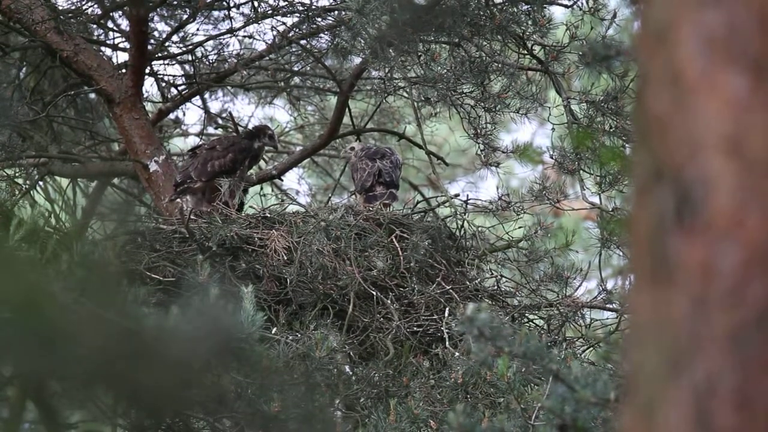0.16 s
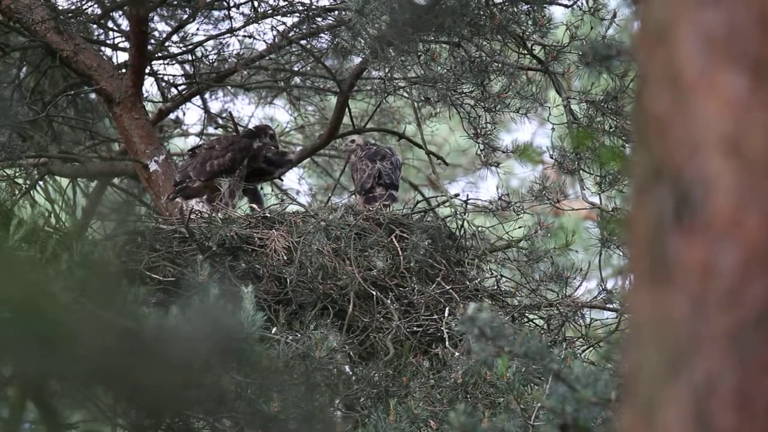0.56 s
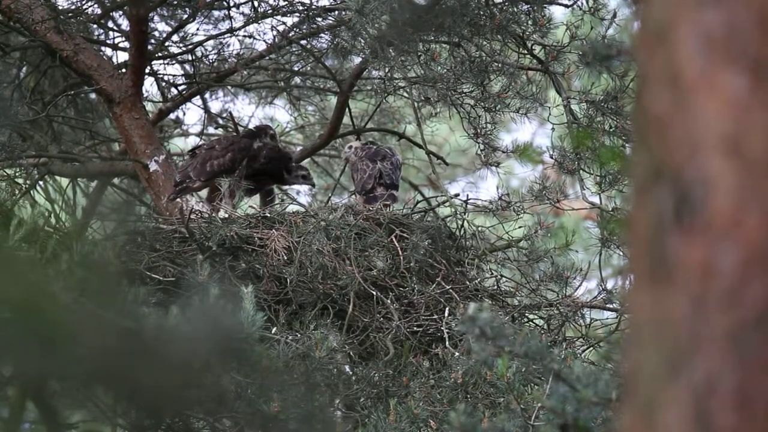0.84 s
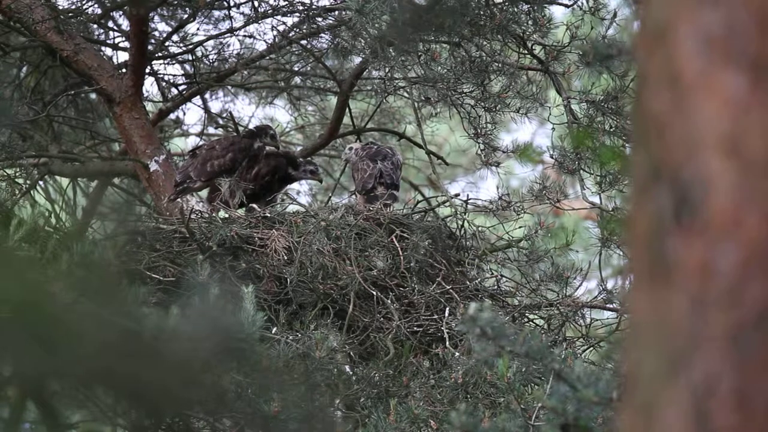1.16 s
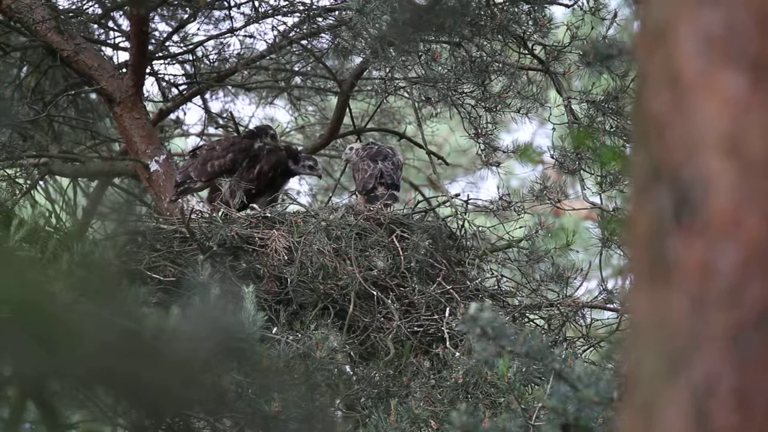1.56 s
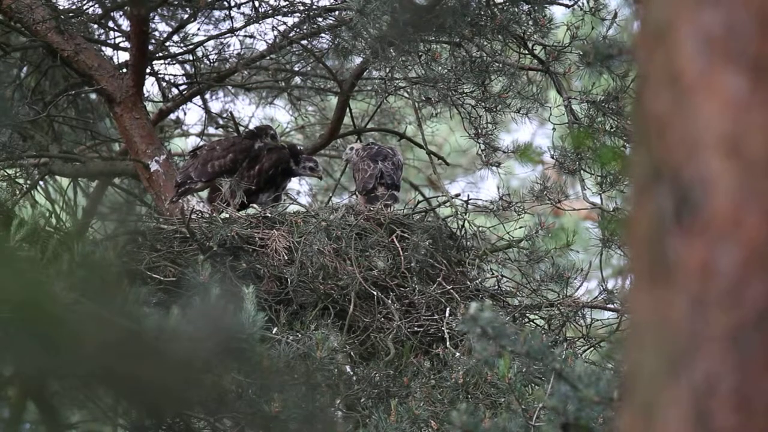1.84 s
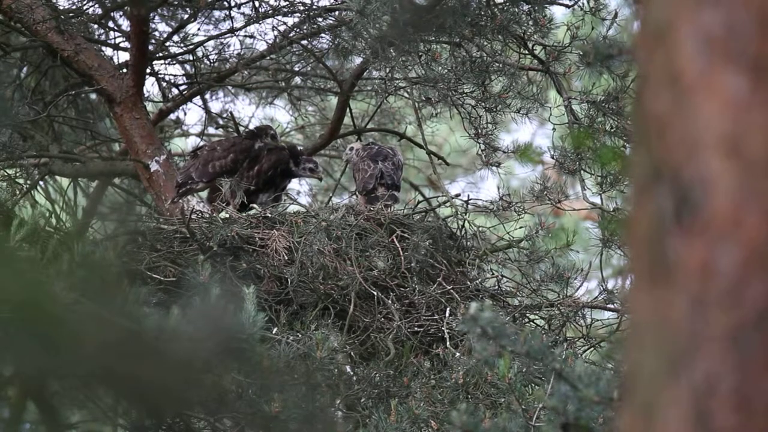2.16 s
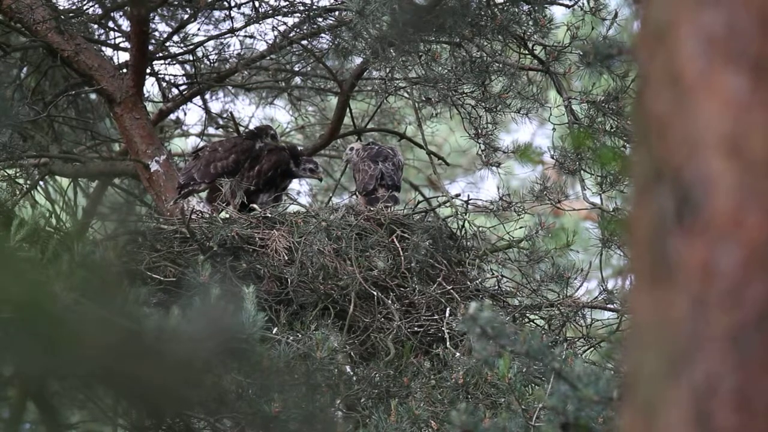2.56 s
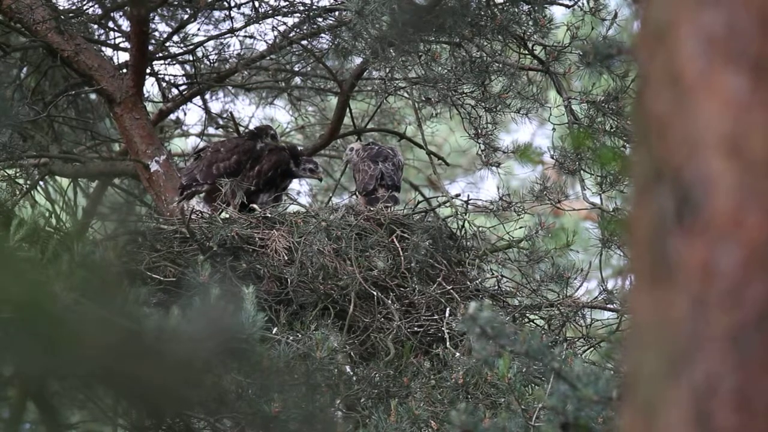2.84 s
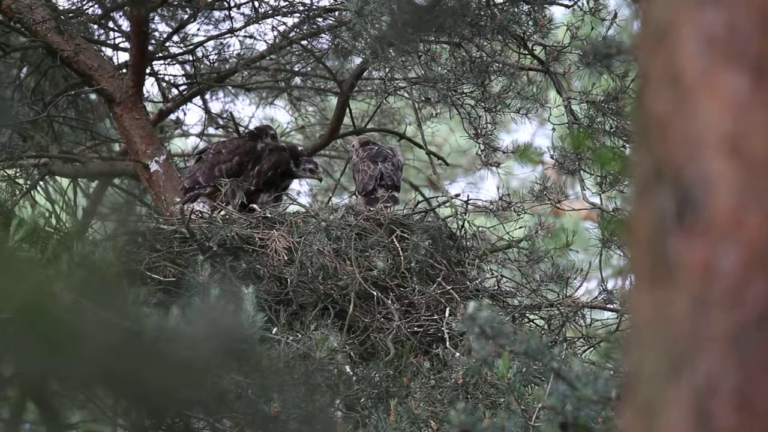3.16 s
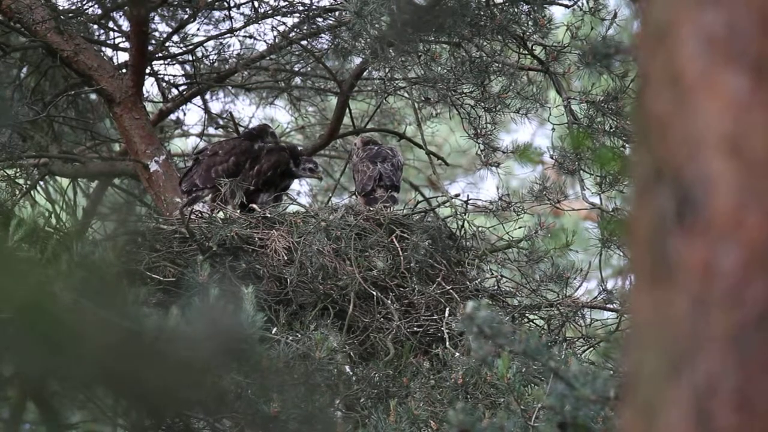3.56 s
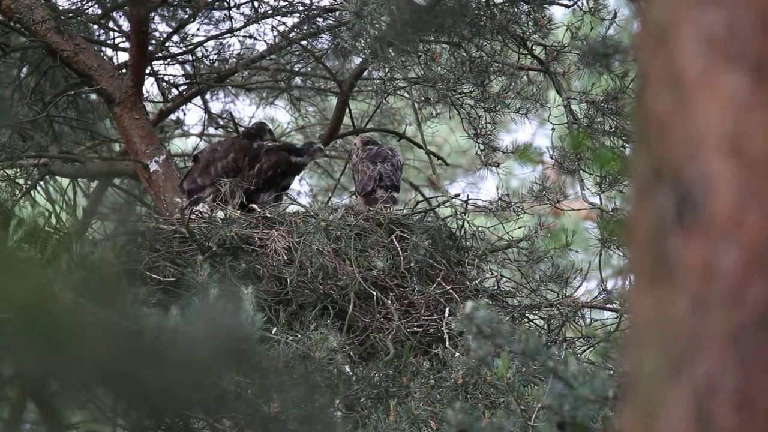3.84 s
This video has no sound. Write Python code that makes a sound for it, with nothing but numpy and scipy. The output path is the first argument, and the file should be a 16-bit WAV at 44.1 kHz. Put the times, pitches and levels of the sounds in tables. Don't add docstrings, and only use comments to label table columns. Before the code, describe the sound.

A small songbird sings thin falling whistles, a rolling trill, a flourish and buzzes in woodland

```python
import sys
import numpy as np
from scipy import signal
from scipy.fft import rfft, irfft
from scipy.io import wavfile
from scipy.ndimage import uniform_filter1d

SR = 44100
rng = np.random.default_rng(int(sys.argv[2]) if len(sys.argv) > 2 else 0)


def makeup_ratio(level_db):
    decades = np.asarray(level_db, float) / 20
    return 10 ** decades


def unload_audio(sound):
    columns = np.transpose(np.atleast_2d(sound))
    steps = np.round(np.clip(columns, -1, 1) * 32767)
    wavfile.write(sys.argv[1], SR, steps.astype(np.int16))


N = 176400
t = np.arange(N) / SR
WAVER, ROUGH_WAVER = .012, .07


def unit_rms(x):
    return x / np.sqrt(np.mean(x ** 2) + 1e-20)


def resonance(x, hz, wide_hz):
    r = np.exp(-np.pi * wide_hz / SR)
    return signal.lfilter([(1 - r * r) / 2, 0, (r * r - 1) / 2], [1, -2 * r * np.cos(2 * np.pi * hz / SR), r * r], x)


def narrow_noise(noise, hz, wide_hz):
    return resonance(resonance(noise, hz, wide_hz), hz, wide_hz)


def lowpass(x, hz, order=1):
    return signal.sosfilt(signal.butter(order, hz, fs=SR, output="sos"), x)


def jitter(smooth_samples, length):
    return unit_rms(uniform_filter1d(rng.standard_normal(N // 8), size=smooth_samples))[:length]


def whistle(out, rows, start=0., db=0., pitch=0.99, top_loss_db=0., waver=WAVER, uneven=0.):
    edge_s, stroke_sharpness = .003, 1.2
    s, *columns = np.transpose(rows)
    note_t = np.arange(s[0], s[-1], 1 / SR)
    hz, level_db, *buzz = [np.interp(note_t, s, c) for c in columns]
    fast, slow = jitter(60, len(note_t)), jitter(300, len(note_t))
    hz = hz * pitch * (1 + waver * fast)
    gain = np.clip(np.minimum(note_t - s[0], s[-1] - note_t) / edge_s, 0, 1)
    if buzz:
        shake_hz, shakes_per_s = buzz
        cycles = np.cumsum(shakes_per_s * np.maximum(1 + uneven * slow, .2)) / SR
        stroke = 1 - 2 * (cycles % 1)
        hz = hz + shake_hz * stroke
        level_db = level_db - top_loss_db * stroke
        gain = gain * (1 - stroke ** 4) ** stroke_sharpness
    wave = np.sin(2 * np.pi * np.cumsum(hz) / SR)
    i = int((start + s[0]) * SR)
    out[i:i + len(note_t)] += np.sqrt(2) * gain * makeup_ratio(level_db + db) * wave


# [f/Hz, level/dB per Hz]
WIND_SPECTRUM = [(15, -55), (25, -23), (113, -10), (152, -12), (241, -5), (588, -2.5), (3680, -19.5),
                 (5090, -20), (15800, -25)]
# [t/s, level/dB]
HUM_LEVEL = [(0, -66.5), (.3, -71), (.4, -62), (.6, -66), (.95, -60.5), (1.25, -71.5), (2.3, -68.5),
             (2.6, -63), (3.2, -65.5), (3.4, -74.5), (3.8, -61)]


def air():
    wind_db, wind_top_hz, hum_hz, hum_wide_hz = -52, 14000, 117.5, 3.1
    hz = np.arange(1, N // 2 + 2) * SR / N
    points_hz, points_db = np.transpose(WIND_SPECTRUM)
    shape = makeup_ratio(np.interp(np.log(hz), np.log(points_hz), points_db))
    shape = shape / np.sqrt(1 + (hz / wind_top_hz) ** 12)
    wind = irfft(rfft(rng.standard_normal(N)) * shape, N)
    wander = unit_rms(uniform_filter1d(rng.standard_normal(N), size=6000))
    pitch = hum_hz + hum_wide_hz * wander
    hum = np.sqrt(2) * np.sin(2 * np.pi * np.cumsum(pitch) / SR)
    return makeup_ratio(wind_db) * unit_rms(wind) + hum * makeup_ratio(np.interp(t, *np.transpose(HUM_LEVEL)))


# [t/s, level/dB]
CRICKET_CHIRPS = [
    (.04, -61.5),
    (.235, -62),
    (.43, -57),
    (.61, -54.5),
    (.795, -50.5),
    (.995, -47),
]


def crickets():
    chirp_s, pulses_per_s, drone_db = .075, 62, -62
    gate = sum(makeup_ratio(db) * np.sin(np.pi * np.clip((t - s) / chirp_s, 0, 1)) for s, db in CRICKET_CHIRPS)
    pulses = np.maximum(np.sin(2 * np.pi * pulses_per_s * t), 0)
    near = unit_rms(narrow_noise(rng.standard_normal(N), 5000, 1000))
    far = unit_rms(narrow_noise(rng.standard_normal(N), 4925, 300))
    return 2 * gate * pulses * near, makeup_ratio(drone_db) * far


# [t/s, peak level/dB, rustle t/s]
TWIG_TICKS = [
    (0.4229, -46, 0.03),
    (1.3923, -36.5, 0.03),
    (1.4417, -41, 0.03),
    (1.9135, -46, .02),
    (2.0117, -44, 0.023),
    (2.164, -36.5, 0.06),
    (2.2405, -36.5, 0.056),
    (2.308, -38, 0.018),
    (2.6967, -41, 0.044),
]
# [t/s, f/Hz, level/dB]
TWIG_KNOCK = [(1.39, 3130, -46.5), (1.396, 2050, -38.5)]


def twigs():
    snap_db, snap_s, rustle_db = -1.5, .003, -12
    snap, rustle = np.zeros(N), np.zeros(N)
    for s, db, tail_s in TWIG_TICKS:
        since = np.maximum(t - s, 0)
        on = t >= s
        rise = np.minimum(since / snap_s * 2, 1)
        snap += on * makeup_ratio(db + snap_db) * np.exp(-since / snap_s) * rise
        rustle += on * makeup_ratio(db + rustle_db) * np.exp(-since / max(tail_s, .005))
    band = signal.butter(3, [2500, 10500], "band", fs=SR, output="sos")
    snaps = signal.sosfilt(band, snap * rng.standard_normal(N))
    rustles = narrow_noise(rustle * rng.standard_normal(N), 11500, 4500)
    knock = np.zeros(N)
    whistle(knock, TWIG_KNOCK, waver=ROUGH_WAVER)
    return knock + snaps + rustles


# [t/s, f/Hz, level/dB]
SWEEP_SHAPE = [(-.006, 7800, -17), (0, 7300, -2), (0.013, 6220, 1.5), (.028, 5000, 2), (.036, 4500, 5),
               (0.046, 3710, 1)]
# [t/s, f/Hz, level/dB]
DIP_SHAPE = [(0, 4950, 1), (.006, 4900, 2), (.014, 4300, 3), (.021, 3800, 2), (.026, 3500, -4),
             (.031, 3900, 2), (.037, 4450, 3), (.045, 4950, 2), (.056, 4930, -2)]
# [t/s, f/Hz, level/dB]
ROLL_SHAPE = [(0, 3450, 5), (.007, 3306, 2.5), (.014, 2842, 3.5), (.02, 2411, -6)]
# [t/s, f/Hz, level/dB]
FLICK_SHAPE = [(0, 5390, 9.8), (.005, 4787, 2.3), (.013, 4200, 14)]
# [t/s, f/Hz, level/dB]
LIFT_SHAPE = [(0, 3260, -1.5), (.012, 3710, -3), (.022, 4300, 5)]
# [t/s, f/Hz, level/dB]
SINK_SHAPE = [(0, 3960, 13), (.012, 3240, -2), (.025, 2800, -3)]
# [t/s, f/Hz, level/dB]
RISE_SHAPE = [(0, 5990, 12), (.012, 9280, 3), (.03, 9140, 2.5), (.045, 8300, -4), (.062, 7580, -10)]
# [t/s, f/Hz, level/dB, shake f/Hz, shakes per s]
THROB_SHAPE = [(0, 5500, -5, 800, 139), (.02, 5905, 0.5, 1010, 139), (.045, 6500, -0.5, 800, 139),
               (.068, 6940, -13, 602.4, 130)]
# [t/s, level/dB, pitch factor]
SWEEP_TIMES = [
    (0.873, -58, 0.97),
    (1.061, -53, 0.94),
    (1.223, -45.5, 0.98),
    (1.387, -43, 0.96),
    (1.548, -44, 1),
    (1.701, -42, 1),
]
# [t/s, level/dB]
DIP_TIMES = [(1.099, -49), (1.177, -48), (1.247, -48.5), (1.328, -48), (1.405, -50), (1.468, -46),
             (1.535, -47), (1.625, -42), (1.672, -47.5), (1.754, -50)]
# [t/s, level/dB, pitch factor]
ROLL_TIMES = [(1.853, -36.5, 0.98), (1.926, -35.5, 0.96), (1.997, -38.5, 0.93), (2.068, -34.5, 0.99),
              (2.137, -35.5, 0.95), (2.208, -34.5, 1.02), (2.278, -33.5, 1.0), (2.346, -35, 1.0),
              (2.416, -35.5, 0.97), (2.483, -37.5, 0.96), (2.555, -34, 0.94)]
# [t/s, level/dB, pitch factor]
FLICK_TIMES = [
    (1.088, -52, 1.18),
    (1.767, -52, 1.13),
    (1.903, -42, 0.892),
    (2.04, -45.5, 0.98),
    (2.187, -46.5, 1.05),
    (2.444, -44, 0.99),
    (2.7, -44.5, 0.77),
]
# [t/s, level/dB, pitch factor]
LIFT_TIMES = [
    (1.824, -37.5, 0.94),
    (1.973, -35, 0.98),
    (2.114, -35, 1.0),
    (2.265, -36, 1),
    (2.321, -39, 1.0),
    (2.396, -38.5, 1.0),
    (2.534, -38.5, 0.94),
]
# [t/s, level/dB, pitch factor]
SINK_TIMES = [(1.125, -59, 0.88), (1.281, -55, 0.88), (1.44, -53, 0.91), (1.584, -49, 0.93),
              (1.664, -46, 0.9), (1.771, -41.5, 0.97), (2.081, -47, 0.75), (2.225, -45.5, 0.75),
              (1.848, -53, 0.85)]
# [t/s, level/dB, pitch factor]
RISE_TIMES = [
    (2.339, -54.5, .72),
    (2.42, -55, 0.68),
    (2.925, -54, 0.983),
    (3.0, -56, 0.99),
    (3.073, -54, 1.0),
    (3.147, -55.5, 0.92),
    (3.219, -53, 0.93),
    (3.28, -54.5, 0.77),
]
# [t/s, level/dB, pitch factor]
THROB_TIMES = [
    (2.925, -45, 1.13),
    (2.995, -43, 1.06),
    (3.064, -41.5, 1.013),
    (3.13, -40.5, 0.98),
    (3.205, -41, 1.0),
    (3.283, -48, 0.7),
]
# [t/s, level/dB, pitch factor]
BLURRED_FLICK_TIMES = [
    (2.67, -46.5, 1.0),
    (3.282, -49, 0.79),
    (3.785, -50, 1.0),
]
# [t/s, f/Hz, level/dB]
DROP_NOTE = [(2.582, 2490, -35), (2.6, 2166, -41), (2.625, 1800, -54)]
# [t/s, f/Hz, level/dB]
FLOURISH_NOTE = [(2.688, 2185, -45), (2.71, 2700, -35.5), (2.741, 3133, -30), (2.757, 3575, -28.5),
                 (2.769, 4310, -30.5), (2.778, 4830, -31), (2.784, 4890, -34.5), (2.795, 5060, -42)]
# [t/s, f/Hz, level/dB]
FALL_NOTE = [(2.786, 3320, -47), (2.799, 3065, -39), (2.82, 2220, -35), (2.84, 1550, -57)]
# [t/s, f/Hz, level/dB]
CHUCK_NOTE = [(3.292, 3424, -34), (3.3, 2574, -41), (3.307, 1900, -45)]
# [t/s, f/Hz, level/dB]
TAG_NOTE = [(3.79, 3946, -41), (3.81, 2990, -47), (3.825, 2042, -46)]
# [t/s, f/Hz, level/dB]
FAINT_NOTES = [
    [(.912, 4680, -57), (.93, 3330, -59), (.942, 4600, -60)],
    [(1.595, 5800, -53), (1.66, 5650, -52.5)],
    [(1.74, 5707, -54), (1.77, 5600, -57)],
    [(2.51, 2520, -46), (2.535, 2030, -55)],
]
# [t/s, f/Hz, level/dB]
HIGH_HAZES = [
    [(2.77, 12800, -46.5), (2.9, 12200, -62)],
    [(3.38, 11650, -55.5), (3.56, 11330, -58)],
]
# [t/s, f/Hz, level/dB]
THUD_NOTE = [(1.44, 2317, -53), (1.455, 1922, -64), (1.469, 1545, -50)]


def birds():
    second_stroke_s, second_stroke_db = 0.027, -4.5
    out = np.zeros(N)
    for shape, times, waver in (
            (SWEEP_SHAPE, SWEEP_TIMES, WAVER), (DIP_SHAPE, DIP_TIMES, WAVER), (ROLL_SHAPE, ROLL_TIMES, WAVER),
            (FLICK_SHAPE, FLICK_TIMES, WAVER), (LIFT_SHAPE, LIFT_TIMES, WAVER), (RISE_SHAPE, RISE_TIMES, .06),
            (SINK_SHAPE, SINK_TIMES, ROUGH_WAVER), (FLICK_SHAPE, BLURRED_FLICK_TIMES, ROUGH_WAVER)):
        for row in times:
            whistle(out, shape, *row, waver=waver)
    for s, db, pitch in SWEEP_TIMES:
        whistle(out, SWEEP_SHAPE[2:], s + second_stroke_s, db + second_stroke_db, pitch)
    for note in (DROP_NOTE, FLOURISH_NOTE, FALL_NOTE, *FAINT_NOTES):
        whistle(out, note)
    for row in THROB_TIMES:
        whistle(out, THROB_SHAPE, *row, top_loss_db=-3.5, waver=ROUGH_WAVER, uneven=.25)
    for note in (CHUCK_NOTE, TAG_NOTE):
        whistle(out, note, waver=ROUGH_WAVER)
    for note in (*HIGH_HAZES, THUD_NOTE):
        whistle(out, note, waver=.1)
    return out


# [t/s, f/Hz, level/dB, shake f/Hz, shakes per s]
LOW_BUZZ_LINE = [(3.366, 5200, -44.5, 497, 230), (3.39, 5160, -34, 776, 199.9),
                 (3.415, 4810, -37.5, 1080, 104.7), (3.45, 4500, -38, 1200, 100.9),
                 (3.5, 4016, -38.5, 1080, 101.1), (3.57, 3320, -38.5, 844, 94.94),
                 (3.62, 2812, -38.5, 800, 63.34), (3.669, 2565, -44, 748, 55.9),
                 (3.7, 2390, -48, 686, 56.25)]


def low_buzz():
    out = np.zeros(N)
    whistle(out, LOW_BUZZ_LINE, top_loss_db=2)
    return out


def wood(x):
    near_t60_s, scatter_t60_s, late_t60_s = .07, .45, 1.2
    near_db, scatter_db, late_db, direct_db = -8, -4, -6, -.3
    lag = np.arange(int(1.6 * SR)) / SR
    rise = 1 - np.exp(-lag / .012)
    near, scatter, late = rng.standard_normal((3, len(lag)))
    near = near * makeup_ratio(-60 * lag / near_t60_s)
    scatter = scatter * rise * makeup_ratio(-60 * lag / scatter_t60_s)
    late = lowpass(late, 5000, order=3) * rise * makeup_ratio(-60 * lag / late_t60_s)
    answer = np.zeros(len(lag))
    for part, db in ((near, near_db), (scatter, scatter_db), (late, late_db)):
        answer += makeup_ratio(db) * part / np.linalg.norm(part)
    echoes = signal.fftconvolve(x, lowpass(answer, 8000))[:N]
    return makeup_ratio(direct_db) * lowpass(x, 3300) + echoes


def scene():
    facing_db = -6.5
    background = air()
    near_cricket, far_crickets = crickets()
    ticks, song, buzz = twigs(), birds(), low_buzz()
    through_wood = wood(song + buzz + near_cricket)
    mono = through_wood + makeup_ratio(facing_db) * buzz + far_crickets + ticks + background
    return np.tile(mono, (2, 1))


def top_cut(x):
    return signal.sosfilt(signal.butter(12, 15960, fs=SR, output="sos"), x)


def record(dry):
    return top_cut(dry)


dry = scene()
out = record(dry)
unload_audio(out)
```